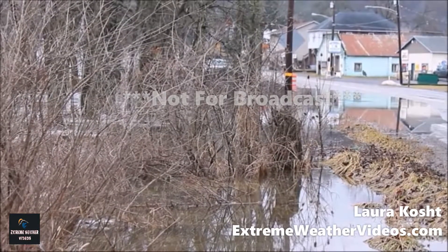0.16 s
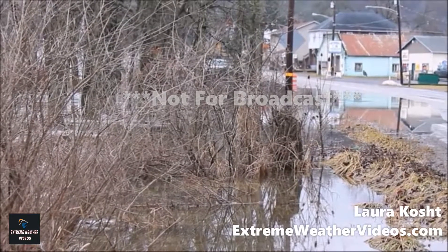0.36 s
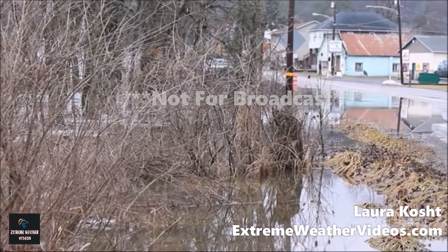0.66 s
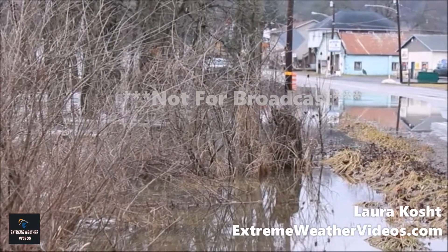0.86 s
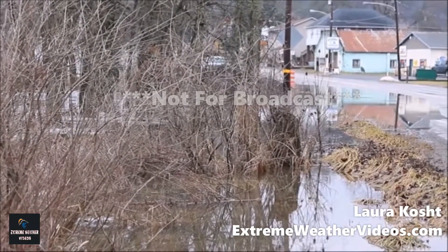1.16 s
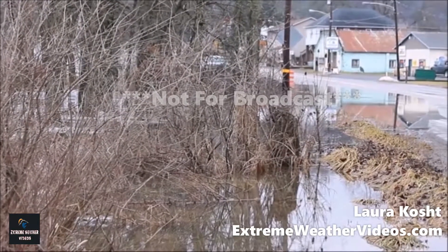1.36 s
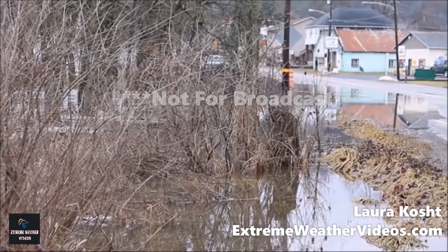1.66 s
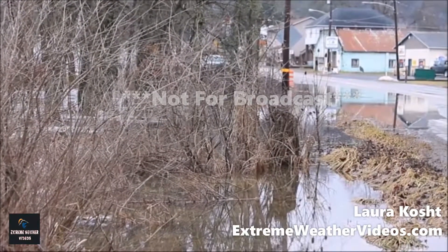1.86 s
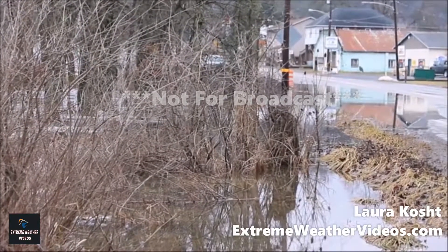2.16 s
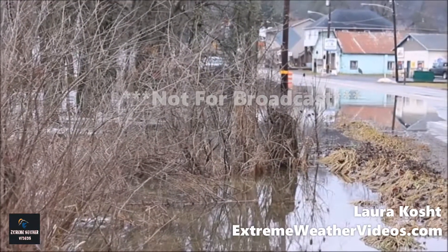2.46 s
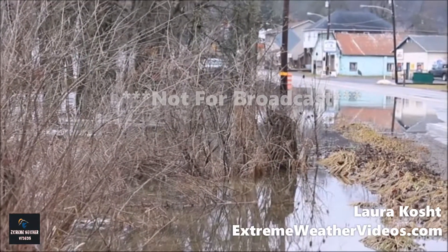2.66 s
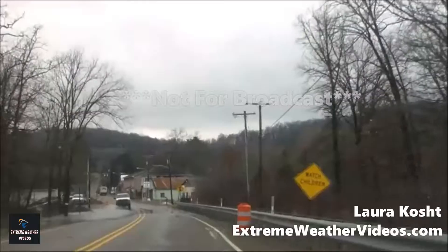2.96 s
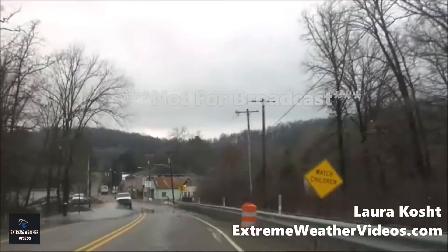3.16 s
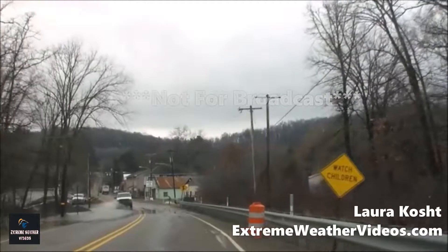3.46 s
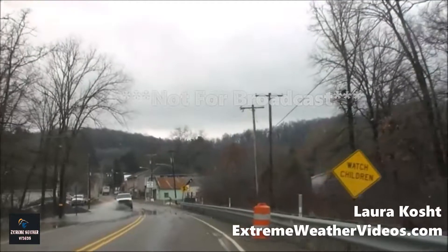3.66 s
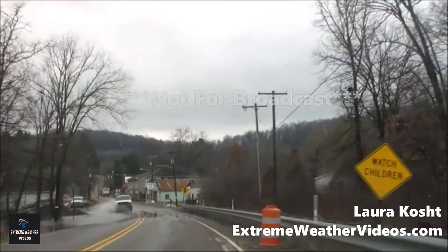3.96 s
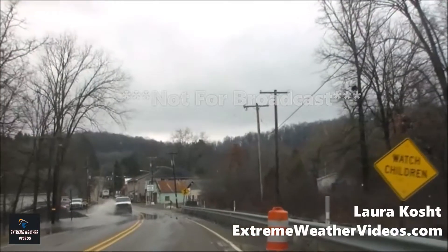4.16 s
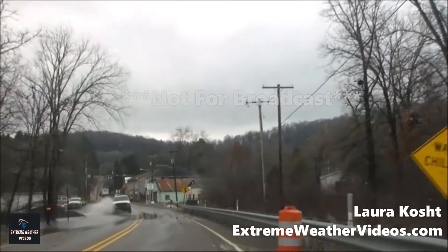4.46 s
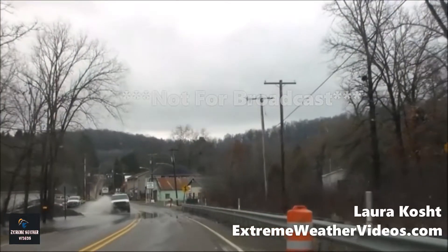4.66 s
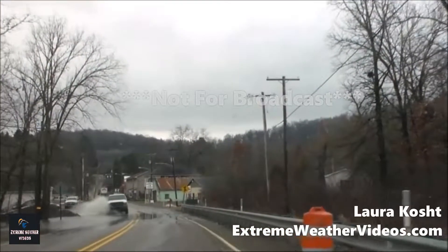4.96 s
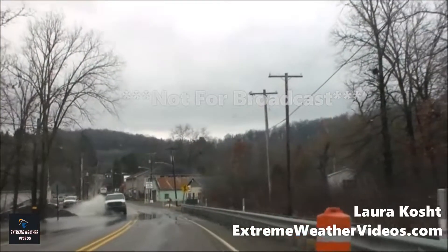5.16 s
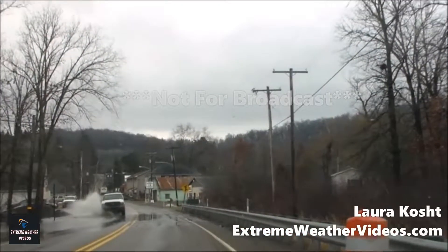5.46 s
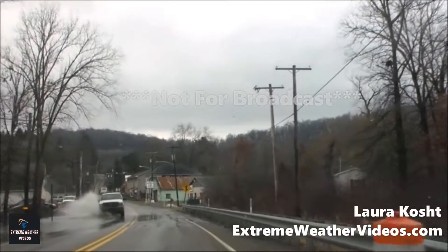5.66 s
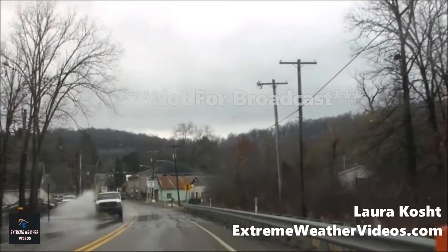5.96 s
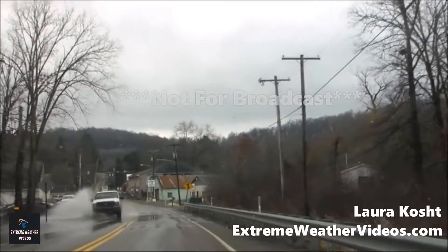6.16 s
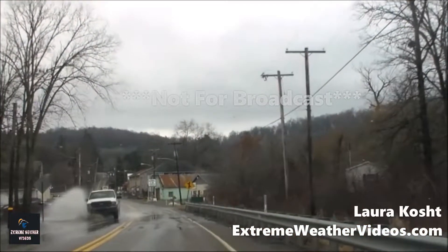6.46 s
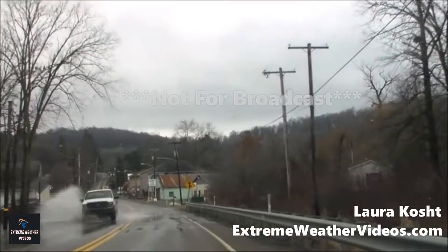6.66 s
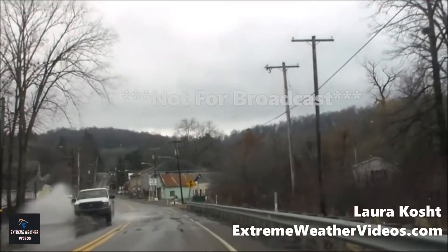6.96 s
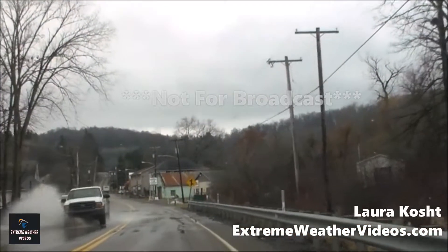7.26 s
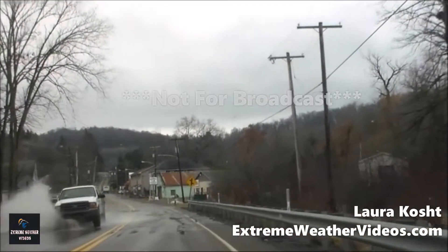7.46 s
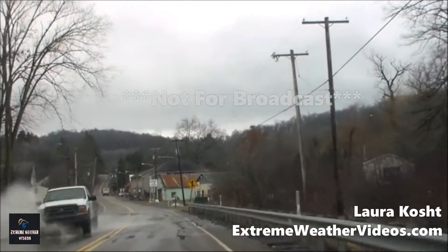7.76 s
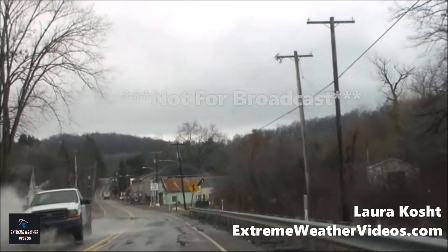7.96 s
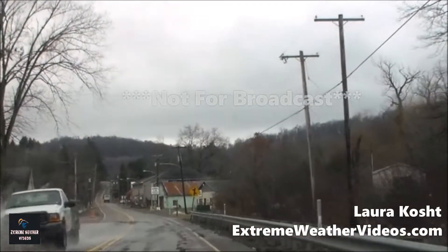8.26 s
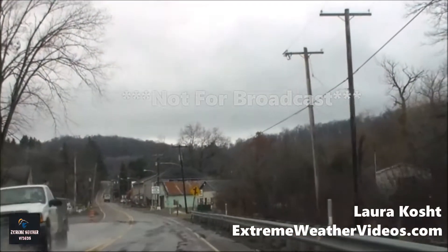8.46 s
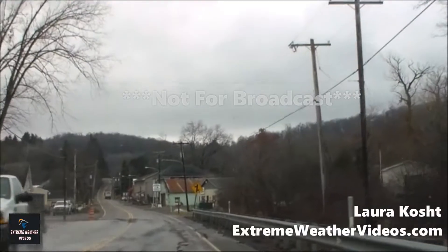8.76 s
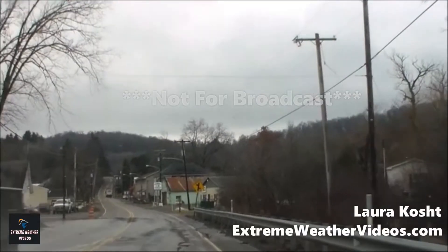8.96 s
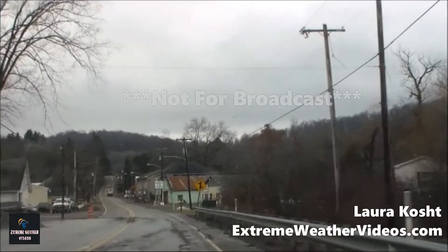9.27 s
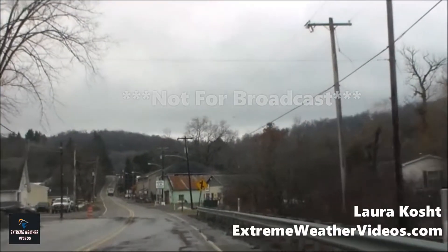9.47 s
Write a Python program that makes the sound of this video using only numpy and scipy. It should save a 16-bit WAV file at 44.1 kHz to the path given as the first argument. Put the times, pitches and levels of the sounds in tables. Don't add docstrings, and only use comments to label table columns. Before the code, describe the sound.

Wet-road traffic: a departing truck's hum and spray fade, then abruptly a moving car's low rumble, jolts, water swish, faint ticking and droplet taps.

```python
import sys
import numpy as np
from scipy import signal
from scipy.fft import rfft, irfft, next_fast_len
from scipy.io import wavfile
from scipy.ndimage import uniform_filter1d, map_coordinates

SR = 44100
rng = np.random.default_rng(int(sys.argv[2]) if len(sys.argv) > 2 else 0)


def wav_record(signal):
    frames = np.transpose(np.atleast_2d(signal))
    bounded = np.clip(frames, -1, 1)
    quanta = np.round(bounded * 32767).astype(np.int16)
    wavfile.write(sys.argv[1], SR, quanta)


def gain_from_db(level_db):
    decades = np.asarray(level_db, float) / 20
    return 10 ** decades


N = 424240
CUT_S = 2.976

# (time [s], firing rate [Hz])
FIRING = [
    (0, 141.5),
    (.2, 142.3),
    (1.26, 142.3),
    (1.6, 143.4),
    (2.3, 143.2),
    (2.6, 141.2),
    (2.73, 138),
    (2.85, 132),
    (2.97, 129.5),
]
# (order [eighths of the firing rate], level [dB])
SHAFT = [(5, -18), (6, -16), (7, -14), (8, 1.5), (9, -7.5), (10, -12), (11, -0.5), (13, -13.5), (16, -15.5),
         (17, -14), (19, -10.5), (23, -15), (31, -17.5)]
# (frequency [Hz], level [dB per Hz])
ROAR = [(12, -63), (20, -42), (107, -17), (141, -11), (201, -9.5), (228, -5.5), (409, 1), (600, -6),
        (780, -23), (1320, -120)]
# (frequency [Hz], level [dB per Hz])
ROAR_FAR = [(12, -82), (20, -55), (107, -3), (120, -9), (135, -9), (167, -6), (195, 1), (600, -12.5),
            (780, -51), (1320, -120)]
# (frequency [Hz], level [dB per Hz])
TYRE = [(320, -23.5), (550, -7), (648, -3), (813, 0.5), (1050, -3.5), (1320, -4.5), (2420, -18.5),
        (2640, -21), (3000, -23.5), (3900, -51), (6600, -120)]
# (frequency [Hz], level [dB per Hz])
SPRAY = [(1290, -14), (2200, -6.5), (6410, -16.5), (8000, -21.5), (15500, -39.5)]
# (time [s], distance [m])
DISTANCE = [(0, 9.7), (.25, 10.3), (.6, 11.5), (.9, 13.3), (1.3, 17.3), (2.0, 27), (2.36, 29.3), (2.77, 38),
            (2.97, 38)]
# (frequency [Hz], level [dB])
BED = [(300, -4.5), (350, 0.5)]
# (time [s], hold [s], level [dB], rise [dB/s], fall [dB/s])
POTHOLE = (.765, .03, -21, 300, 200)
# (time [s], hold [s], level [dB], rise [dB/s], fall [dB/s])
SLAP = (2.575, .004, -22, 4000, 600)
# (time [s], hold [s], level [dB], rise [dB/s], fall [dB/s])
BEAT = (0.27, 0.036, 1.5, 17, 15)
# (time [s], hold [s], level [dB], rise [dB/s], fall [dB/s])
PLUME = (0.04, 0.36, -29, 12, 43)
# (time [s], hold [s], level [dB], rise [dB/s], fall [dB/s])
NEXT_CAR = (2.95, .1, -44, 27, 25)
# (time [s], length [s], top frequency [Hz])
GAPS = [(.685, .02, 6500), (.728, .022, 6500), (1.52, .052, 7300), (1.582, .02, 6500), (1.735, .018, 7000),
        (2.072, .018, 7500), (2.308, .02, 7800), (2.352, .018, 7000), (2.477, .02, 6000),
        (2.905, .022, 6500)]

# (frequency [Hz], level [dB per Hz])
BOOM = [(4.7, -15), (8.0, -8), (38, 2), (49, 0), (70, -12.5), (95, -12), (120, -65), (210, -120)]
# (frequency [Hz], level [dB per Hz])
DRONE = [(53, -38), (90, -5.5), (113, 0), (146, 1.5), (159, -1.5), (183, -14.5), (210, -23), (270, -51),
         (460, -120)]
# (frequency [Hz], level [dB per Hz])
ROAD = [(110, -23), (190, -3), (296, -4), (350, -6.5), (551, -14), (604, -11), (700, -26), (910, -23),
        (1540, -120)]
# (frequency [Hz], level [dB per Hz])
TREAD = [(400, -40), (680, -0.5), (865, -1.5), (1170, -6.5), (1570, -8), (1900, -14), (2470, -30),
         (4180, -120)]
# (frequency [Hz], level [dB per Hz])
SWISH = [(1060, -34), (1800, -4), (2050, -3.5), (2540, 1), (3390, -6.5), (4300, -15.5), (5590, -34),
         (9460, -120)]
# (frequency [Hz], level [dB per Hz])
MIST = [(2350, -13), (4000, -9.5), (7290, -11.5), (8000, -13.5), (10400, -10.5), (17600, -120)]
# (frequency [Hz], level [dB per Hz])
SLOSH = [(400, -35), (680, -15), (757, 1), (1120, -3), (1600, -11), (2080, -42), (3520, -120)]
# (frequency [Hz], level [dB per Hz])
SHEET = [(2240, -39), (3800, -6), (5770, -2), (6640, -1), (8000, -5), (10400, -26), (17600, -120)]
# (frequency [Hz], level [dB per Hz])
HISS = [(4600, -36), (7800, -12), (8350, -14), (10100, -8), (12200, 4), (12600, -5), (14300, -2),
        (15000, -120)]
# (time [s], gain drop [dB])
JOLTS = [(3.247, 5.5), (3.478, 3), (3.589, 4), (3.691, 1), (3.978, 3), (4.182, 1), (4.363, 5), (4.506, 2),
         (4.83, 3.5), (4.969, 3.5), (5.376, 5), (5.644, 2.5), (6.024, 0.5), (6.401, 3.5), (6.642, 4),
         (6.978, 3.5), (7.181, 2.5), (7.257, 3.5), (7.393, 1), (7.456, 2.5), (7.623, 2), (8.141, 1.5),
         (8.281, 2), (8.748, 3.5), (8.891, 1), (8.997, 1), (9.148, 1.5), (9.298, 3), (9.388, 3), (9.515, 3)]
# (time [s], peak level [dB], ring [Hz], click [Hz])
TAPS = [(4.485, -38, 750, 1600), (4.695, -34.5, 935, 2060), (5.049, -41, 770, 1700),
        (6.359, -52, 1270, 2600), (8.22, -41, 1000, 2000), (8.932, -32.5, 1140, 2830),
        (9.1, -52, 3730, 3700), (9.172, -39, 776, 1700), (9.288, -44, 2550, 2500), (9.473, -35, 1100, 2600)]
# (time [s], injection cycles so far)
TURNS = [(2.9, 78.72), (8.0, 218.82), (8.8, 240.56), (9.7, 265.13)]
# (frequency [Hz], width [Hz], level [dB])
OPEN = [(8250, 380, 1), (9940, 400, 6), (11150, 230, 0), (12200, 580, 0)]
# (frequency [Hz], width [Hz], level [dB])
SHUT = [(8440, 840, 2), (9250, 260, -14), (11300, 500, -9), (12230, 230, -5)]
# (time [s], level [dB])
LOAD = [(3.0, -58), (3.6, -54.5), (3.9, -55), (4.5, -56), (5.4, -54.5), (6.1, -57), (6.6, -52),
        (7.2, -53.5), (8.1, -59), (9.6, -58)]
# (frequency [Hz], left-right likeness [0-1])
ALIKE = [(60, 1), (130, 0.92), (290, 0.9), (640, 0.95), (1410, 0.74), (3100, 0.66), (6820, 0.037),
         (15000, 0.04)]
# (frequency [Hz], left minus right [dB])
LEAN = [(60, -6.5), (110, -4.5), (200, -2), (380, -1), (700, -0.5), (1290, 0.5), (2380, 0.5), (4400, 0.0),
        (8120, 0.5), (15000, -1)]
# (time [s], hold [s], slosh level [dB], spray level [dB])
PUDDLE = [
    (3.237, .02, -39, -52),
    (3.42, 0.15, -45, -50.5),
]
# (frequency [Hz], width [Hz], level [dB])
PANELS = [(599, 10.4, -48), (1270, 50, -63.5), (1600, 52, -63.5), (2500, 37, -70.5), (2910, 86, -73)]
# (lower edge [Hz], upper edge [Hz])
GATED_HZ = (12400, 14300)
# (time [s], hold [s], level [dB], rise [dB/s], fall [dB/s])
DRAIN = (3.62, .55, -57, 140, 250)
# (frequency [Hz], width [Hz], level [dB])
ARCHES = [(1380, 200, -2), (1770, 160, 3.5), (2460, 150, 3.5), (3010, 200, 3), (3510, 350, 1.5)]
# (time [s], level over the usual [dB])
WET = [(3.0, 1.5), (3.3, 9), (3.6, 8.5), (3.9, 2.5), (4.5, .5), (4.9, -1.5), (5.4, -.5), (5.7, .5),
       (6.1, -4.5), (6.35, -2), (6.6, 2.5), (6.9, 0), (7.3, 2.5), (7.55, 1), (7.9, -2), (8.4, 0), (9.0, 1),
       (9.6, 8)]
# (time [s], roughness over the usual [dB])
ROUGH = [(3.0, -2), (3.3, 3), (3.9, -0.5), (4.5, 3), (4.95, -2.5), (5.45, 1), (5.75, 2.5), (6.05, -3.5),
         (6.4, 0.5), (6.9, 3), (7.5, 0), (8.2, -3), (8.7, -1), (9.0, -3.5), (9.3, 3.5), (9.6, 4.5)]
# (time [s], hold [s], level [dB], rise [dB/s], fall [dB/s])
ONCOMING = (8.69, .06, -53, 50, 8)


def unit(x):
    return x / np.sqrt(np.mean(x ** 2) + 1e-20)


def along(points, hz):
    f, v = np.transpose(points)
    return np.interp(np.log(hz + 1), np.log(f + 1), v)


def curves(rows):
    s, *cols = np.transpose(rows)
    return [np.interp(np.arange(N) / SR, s, c) for c in cols]


def wobble(rate):
    knots = rng.standard_normal(int(N * rate / SR) + 4)
    return map_coordinates(knots, [np.arange(N) * rate / SR])


def swell(start, hold, db, rise, fall):
    t = np.arange(N) / SR
    before, after = rise * (start - t), fall * (t - start - hold)
    return gain_from_db(db - np.maximum(0, np.maximum(before, after)))


def filtered(x, response):
    m = next_fast_len(N + 8192)
    return irfft(rfft(x, m) * response(np.fft.rfftfreq(m, 1 / SR)), m)[..., :N]


def modes(table):
    def response(f):
        total = 0
        for k, (c, w, db) in enumerate(table):
            total = total + (-1) ** k * gain_from_db(db) * 1j * f * w / (c * c - f * f + 1j * f * w)
        return total
    return response


def rush(spectrum, patchy_db, grit_db=0.):
    z = signal.stft(rng.standard_normal((2, N + 512)), nperseg=512)[2]
    field = uniform_filter1d(rng.standard_normal(z.shape[1:]), size=6, axis=0)
    field = uniform_filter1d(field, size=10, axis=1)
    pair = signal.istft(z * gain_from_db(patchy_db * unit(field)), nperseg=512)[1][:, :N]
    pair = pair * gain_from_db(grit_db * wobble(300))

    def mid_side(hz):
        turn = np.arccos(np.clip(along(ALIKE, hz), -1, 1)) / 2
        return gain_from_db(along(spectrum, hz)) * [np.cos(turn), np.sin(turn)]

    mid, side = filtered(pair, mid_side)
    return unit(np.array([mid + side, mid - side]))


def spread_db():
    return -20 * np.log10(curves(DISTANCE)[0] / 10)


def roadside_hiss():
    noise = rng.standard_normal(N)
    return gain_from_db(-69) * unit(filtered(noise, lambda hz: 1 / (1 + (8000 / (hz + 1)) ** 4)))


def truck_spray():
    spray = unit(rush(SPRAY, patchy_db=1.15, grit_db=0.7)[0])
    top = filtered(spray, lambda hz: 1 / (1 + (7500 / (hz + 1)) ** 3))
    spray = spray + top * (gain_from_db(-1.5 - 5.2 * np.arange(N) / SR) - 1)
    wheels = gain_from_db(-28 + 1.05 * spread_db())
    return gain_from_db(1.87) * np.sqrt(wheels ** 2 + swell(*PLUME) ** 2 + swell(*NEXT_CAR) ** 2) * spray


def truck_tyres():
    level = gain_from_db(-17.5 + spread_db() + 0.16 * wobble(14.2))
    return np.hypot(level, swell(*SLAP)) * unit(rush(TYRE, patchy_db=1.0, grit_db=0.5)[0])


def load_bed():
    t = np.arange(N) / SR
    return swell(*POTHOLE) * sum(gain_from_db(db) * np.sin(2 * np.pi * hz * t) for hz, db in BED)


def exhaust_roar():
    close = unit(rush(ROAR, patchy_db=0.0)[0])
    far = unit(filtered(close, lambda hz: gain_from_db(along(ROAR_FAR, hz) - along(ROAR, hz))))
    gone = np.clip((np.arange(N) / SR - .6) / 2.4, 0, 1)
    floor_db = -34
    level = np.sqrt(gain_from_db(-18.5 + 2.16 * spread_db()) ** 2 + gain_from_db(floor_db) ** 2)
    return level * gain_from_db(0.79 * wobble(11.1)) * ((1 - gone) * close + gone * far)


def exhaust_orders():
    turns = np.cumsum(curves(FIRING)[0]) / SR / 8
    floor_db = -4.5
    beam_db = 20 * np.log10(np.hypot(swell(*BEAT), gain_from_db(floor_db)))
    lines = 0
    for k, db in SHAFT:
        order = round(k)
        uneven_db = (order != 8) * (1.76 * wobble(5.05) + beam_db)
        phase = 2 * np.pi * order * turns + 0.091 * wobble(9.5) + 7 * rng.random()
        lines = lines + gain_from_db(db + uneven_db) * np.sin(phase)
    return gain_from_db(-18.5 + 1.39 * spread_db()) * lines


def truck():
    return roadside_hiss() + truck_spray() + truck_tyres() + load_bed() + exhaust_roar() + exhaust_orders()


def dropouts(x):
    hz, _, z = signal.stft(x, SR, nperseg=2048)
    strong = (hz[:, None] < 2600) | (np.abs(z) > 1.35 * uniform_filter1d(np.abs(z), size=40, axis=0))
    starved = signal.istft(z * strong, SR, nperseg=2048)[1][:N]
    t, out = np.arange(N) / SR, x.copy()
    for s, length, top_hz in GAPS:
        near = slice(round((s - .1) * SR), round((s + .1) * SR))
        lowpass = signal.butter(8, top_hz, fs=SR, output="sos")
        dull = signal.sosfiltfilt(lowpass, starved[near])
        share = np.clip(length / .023 * (1 - (2 * (t[near] - s) / (length + .014)) ** 2), 0, 1)
        out[near] += share * (dull - out[near])
    return out


def crackle():
    steps_per_s = 7
    steps = gain_from_db(-40 + 3 * rng.standard_normal(N)) * (rng.random(N) < steps_per_s / SR)
    for s, drop_db in JOLTS:
        steps[round((s - .003) * SR)] = -gain_from_db(-38 + 1.5 * drop_db)
    floor = unit(filtered(rng.standard_normal((2, N)), modes([(5500, 5000, 0)])))
    return filtered(steps, modes([(3000, 6000, 0)])) + gain_from_db(-68.5) * floor


def drain():
    flow = rng.standard_normal(N) + 0.71 * rng.standard_normal((2, N))
    hollow = filtered(flow, lambda f: modes(ARCHES)(f) ** 2 + .3 * (f > 1300) * (f < 3900))
    return swell(*DRAIN) * gain_from_db(1.3 * wobble(20)) * unit(hollow)


def mist(wet_db, surge):
    return gain_from_db(-63.5 + 1.24 * wet_db + 0.24 * surge) * rush(MIST, patchy_db=2.5, grit_db=2.0)


def swish(wet_db, surge, passing):
    level = np.hypot(gain_from_db(-60.5 + 1.36 * wet_db), passing)
    return level * gain_from_db(-3.5 + 1.4 * surge) * rush(SWISH, patchy_db=1.5, grit_db=2.0)


def puddle():
    slosh = sum(swell(s, hold, db, 110, 270) for s, hold, db, _ in PUDDLE)
    sheet = sum(swell(s, hold + 0.057, db, 170, 72) for s, hold, _, db in PUDDLE)
    slosh = slosh * rush(SLOSH, patchy_db=3, grit_db=-1.5)
    return slosh + sheet * rush(SHEET, patchy_db=2, grit_db=1.5)


def panels(tread_db):
    shake = rng.standard_normal(N) + 0.16 * rng.standard_normal((2, N))
    return filtered(gain_from_db(tread_db + 69) * shake, modes(PANELS))


def tread(tread_db, surge, passing):
    level = np.hypot(gain_from_db(tread_db), gain_from_db(3) * passing)
    return level * gain_from_db(-3.5 + 0.21 * surge) * rush(TREAD, patchy_db=1.8, grit_db=0.7)


def floor_pan(wet_db, surge, passing):
    pan_db = -43 + 0.65 * curves(ROUGH)[0] + 0.26 * wet_db + 0.51 * surge
    return np.hypot(gain_from_db(pan_db), gain_from_db(8.5) * passing) * rush(ROAD, patchy_db=2.0)


def water():
    wet_db, = curves(WET)
    tread_db = -51 + wet_db
    surge, passing = .7 * wobble(9), swell(*ONCOMING)
    hiss = gain_from_db(-67.0) * rush(HISS, patchy_db=2.0)
    fine = mist(wet_db, surge) + swish(wet_db, surge, passing) + puddle()
    low = panels(tread_db) + tread(tread_db, surge, passing) + floor_pan(wet_db, surge, passing)
    return hiss + fine + low


def taps():
    out, t = np.zeros(N + SR), np.arange(SR // 20) / SR
    for s, db, ring_hz, click_hz in TAPS:
        ring = gain_from_db(-60 * t / .035) * np.sin(2 * np.pi * ring_hz * t) * (1 - np.exp(-t / .0008))
        click = gain_from_db(-60 * t / 0.01) * np.sin(2 * np.pi * click_hz * t) * (1 - np.exp(-t / .0004))
        out[round(s * SR):][:len(t)] += gain_from_db(db) * (ring + 0.56 * click)
    return out[:N]


def ticks():
    turns, load_db = curves(TURNS)[0], curves(LOAD)[0]
    t = np.arange(SR // 10) / SR
    shape = (gain_from_db(-60 * t / 0.057) + 1.2 * gain_from_db(-60 * t / 0.047)) * (1 - np.exp(-t / 0.00091))
    out = 0
    for late, table, db, grows in ((.81, OPEN, 0, 0.43), (1.13, SHUT, -.5, 0)):
        at = np.flatnonzero(np.diff(np.floor(turns - late)))
        blows = np.zeros(N)
        blows[at] = gain_from_db(db + 1.3 * rng.standard_normal(len(at)))
        fade = signal.fftconvolve(blows, shape)[:N] * gain_from_db(grows * (load_db + 51.5))
        scatter = rng.standard_normal((2, N)) + .5 * rng.standard_normal(N)

        def ringing(f):
            return modes(table)(f) / (1 + (7600 / (f + 1)) ** 24 + (f / 12500) ** 30)

        out = out + filtered(fade * scatter, ringing)
    return gain_from_db(load_db - 4.5) * unit(out)


def boom():
    drone_db = -33.5 + 0.9 * curves(ROUGH)[0] + wobble(5.1)
    t = np.arange(N) / SR
    air = gain_from_db(-24.5) * rush(BOOM, patchy_db=1.5) + gain_from_db(drone_db) * rush(DRONE, patchy_db=.5)
    for s, drop_db in JOLTS:
        near = slice(round((s - .06) * SR), round((s + .06) * SR))
        u = t[near] - s + 0.0027
        thump = np.cos(2 * np.pi * 37 * u) * np.exp(-(u / 0.021) ** 2)
        air[:, near] += gain_from_db(-22.5 + 0.48 * drop_db) * thump
    return np.where(air > 0, air / (1 + np.abs(air / 0.19) ** 3) ** (1 / 3), air)


def ducking():
    drops, t = np.zeros(N), np.arange(SR) / SR
    for s, drop_db in JOLTS:
        drops[round((s - .003) * SR)] = drop_db
    recovery = np.exp(-t / 0.15) * (1 - np.exp(-t / .0006))
    return gain_from_db(3.0 - 1.4 * signal.fftconvolve(drops, recovery)[:N])


def gated(x):
    hz, t, z = signal.stft(x, SR, nperseg=512)
    patches = rng.random((len(hz) // 3 + 1, len(t) // 6 + 1))
    patches = np.kron(patches, np.ones((3, 6)))[:len(hz), :len(t)]
    chance = np.interp(hz, GATED_HZ, (.85, .45), left=1, right=0)
    return signal.istft(z * (patches < chance[:, None]), SR, nperseg=512)[1][:, :N]


def scene():
    gain = ducking()
    cabin = gain * (drain() + water() + taps() + ticks()) + crackle()
    cabin = cabin + gain ** 0.37 * boom()
    cabin = filtered(gated(cabin), lambda hz: gain_from_db(along(LEAN, hz) * [[.5], [-.5]] - 0.28))
    inside = np.clip((np.arange(N) / SR - CUT_S) / .0006 + .5, 0, 1)
    return (1 - inside) * dropouts(truck()) + inside * cabin


def band_limit(x):
    return signal.sosfilt(signal.butter(12, 15660, fs=SR, output="sos"), x)


def record(dry):
    ceiling = .97
    mix = dry / (1 + np.abs(dry / ceiling) ** 14) ** (1 / 14)
    return band_limit(mix)


dry = scene()
out = record(dry)
wav_record(out)
```